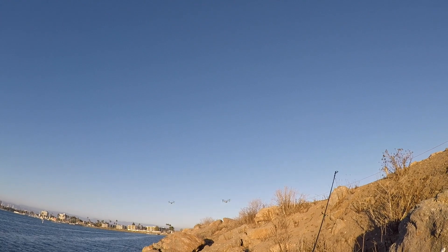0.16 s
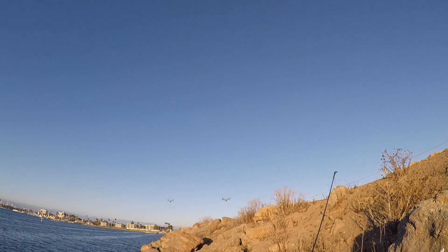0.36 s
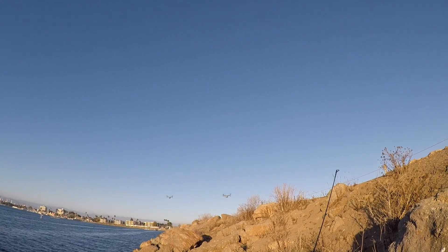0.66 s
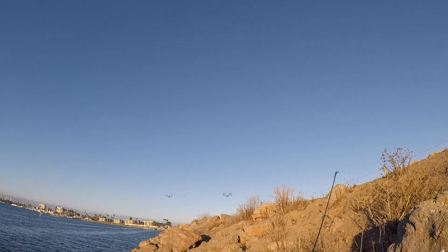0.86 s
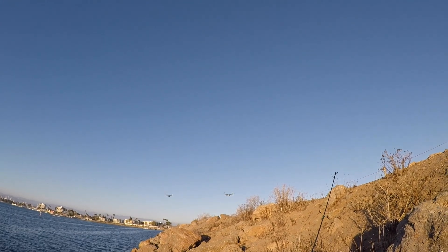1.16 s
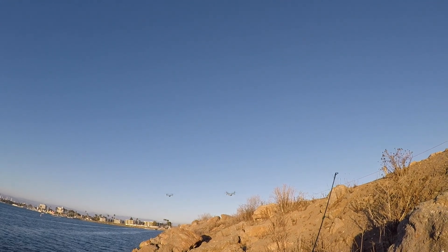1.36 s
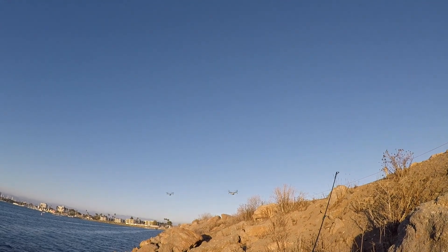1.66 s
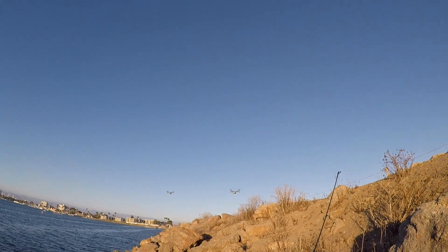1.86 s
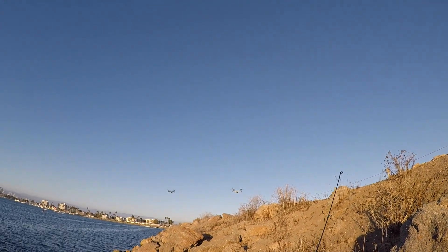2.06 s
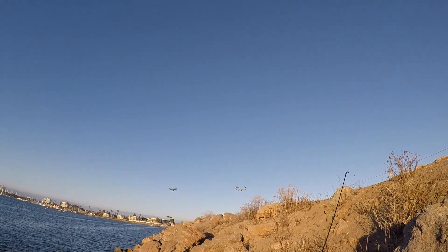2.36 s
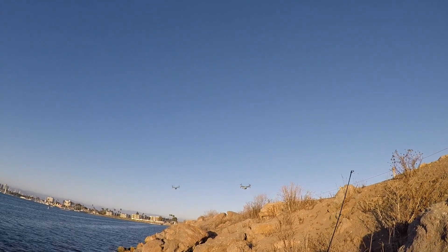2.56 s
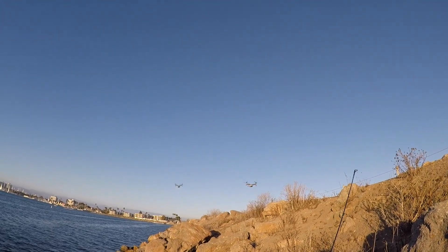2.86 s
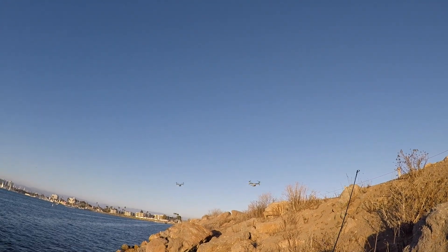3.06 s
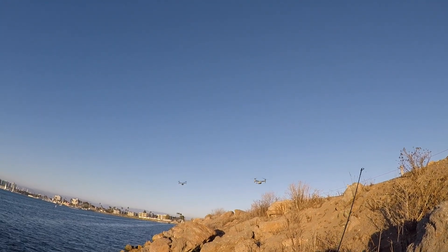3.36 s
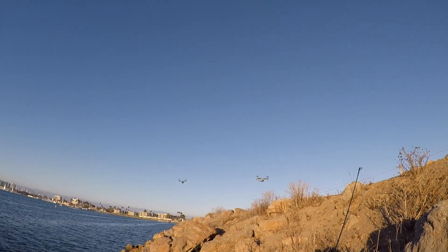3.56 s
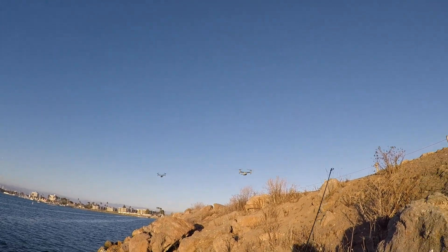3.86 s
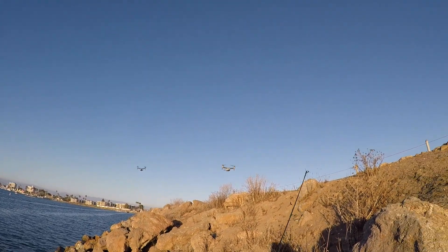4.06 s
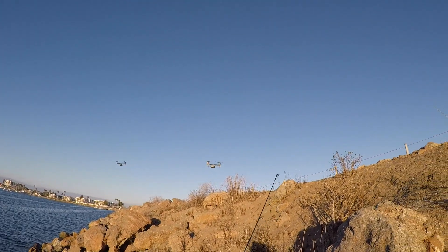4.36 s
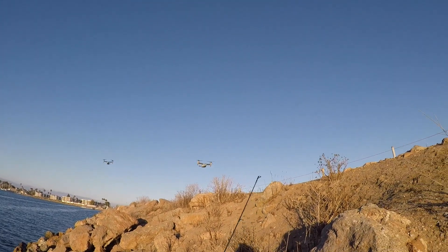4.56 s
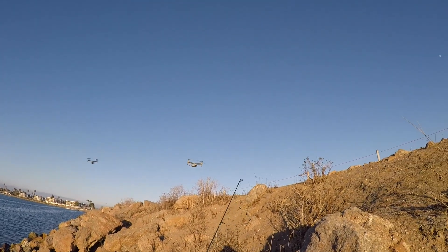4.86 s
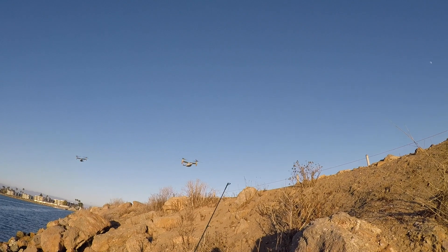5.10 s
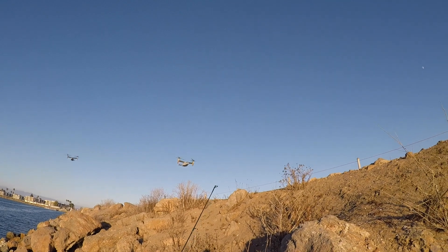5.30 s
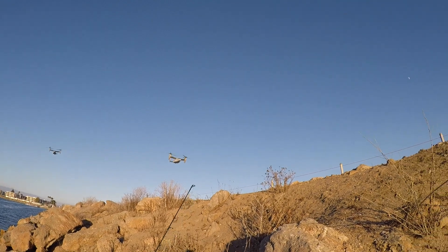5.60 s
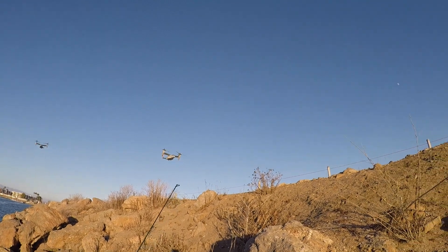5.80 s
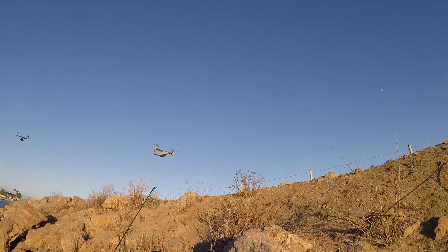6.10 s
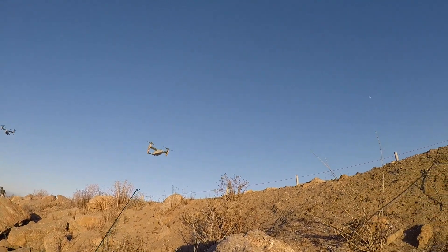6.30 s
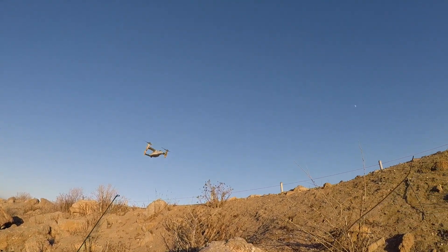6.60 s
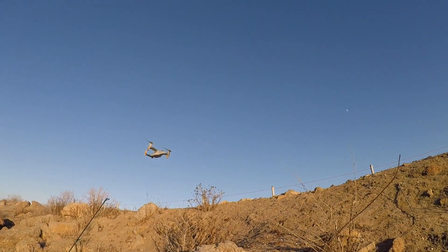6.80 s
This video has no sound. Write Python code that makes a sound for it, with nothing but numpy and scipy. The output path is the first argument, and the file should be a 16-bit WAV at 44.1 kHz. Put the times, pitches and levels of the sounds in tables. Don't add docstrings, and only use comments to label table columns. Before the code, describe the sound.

Two heavy tiltrotor aircraft approach low over water with deep, rapid, overlapping blade thumps under a rushing engine roar, with a few knocks on the microphone.

```python
import sys
import numpy as np
from scipy import signal
from scipy.fft import rfft, irfft, next_fast_len
from scipy.io import wavfile
from scipy.ndimage import uniform_filter1d

SR = 44100
rng = np.random.default_rng(int(sys.argv[2]) if len(sys.argv) > 2 else 0)


def invert_db(level):
    return 10 ** (np.asarray(level, dtype=float) / 20)


def unload_wav(signal):
    wavfile.write(
        sys.argv[1],
        SR,
        np.round(np.clip(np.atleast_2d(signal).T, -1, 1) * 32767).astype(np.int16),
    )


N = 306054
T = np.arange(N) / SR
BLADE_HZ = 23.3

# (time [s], left rotor lag [ms], right rotor lag [ms], left thump [dB], right thump [dB])
FAR_PATH = [(0.0, 23, 24.5, -7.5, -18), (0.5, 18, 22, -7.5, -19), (1.0, 9.5, 13, -9.5, -21),
            (1.5, 2.5, 7.5, -6.5, -19), (2.0, -4.5, -0.5, -11, -16.5), (2.5, -10.5, -7.5, -8.5, -18.0),
            (3.0, -17.5, -12.4, -9, -16), (3.5, -23.5, -21.5, -10.5, -18.5), (4.0, -29, -26.5, -11, -10.5),
            (4.5, -34.5, -30, -13, -13.5), (5.0, -38, -32.9, -11.5, -8), (5.5, -42, -35.5, -9.5, -13.1),
            (6.0, -44.5, -38.0, -10, -12.5), (6.5, -47, -39.0, -11.5, -16),
            (6.75, -48.5, -39.5, -11.5, -11), (6.94, -50, -39.5, -13, -14)]
NEAR_PATH = [(0.0, 44.6, 28.04, -5.5, -12.5), (0.5, 42.88, 26.93, -6.5, -10.7),
             (1.0, 40.26, 24.48, -7, -9.5), (1.5, 39.35, 23.46, -8.5, -7.5), (2.0, 38.34, 22.48, -10, -9),
             (2.5, 37.47, 22.15, -7.5, -7.5), (3.0, 37.65, 20.57, -6.5, -6.5),
             (3.5, 37.67, 20.64, -7.5, -12.5), (4.0, 39, 20.5, -9, -9), (4.5, 41.93, 21.61, -6.5, -4.5),
             (5.0, 44.82, 22.0, -5.0, -6), (5.5, 49.82, 23.98, -9, -6), (6.0, 57.13, 27.6, -6, -4),
             (6.5, 66.3, 32.13, -7, -6.5), (6.75, 74.3, 36.95, -7.3, -4), (6.94, 80.7, 41.5, -7.5, -4)]
# (thump width [ms], ground echo delay [ms], ground share [0-1], bank echo delay [ms], bank share [0-1])
FAR_ROTORS = [
    ((2, 1.22), (1.9, 8.85), (0.42, 0.34), (16.7, 16.9), (0.22, .08)),
    ((1.67, 1.08), (3.1, 5.4), (.48, 0.21), (17.0, 19), (.46, .01)),
]
NEAR_ROTORS = [
    ((1.502, 1.61), (9.65, 11.4), (.24, 0.16), (16.75, 19.4), (.11, .01)),
    ((1.825, 1.246), (7.1, 13.0), (.39, 0.32), (19.1, 19), (.18, 0.078)),
]
# (time [s], level [dB], clearness of the air path [dB])
ROAR_LEVEL = [(0.0, -42.3, -6), (0.4, -38.5, -10), (0.8, -37.5, -15.5), (1.2, -35, -10.5), (1.5, -37, -4.5),
              (1.9, -36.5, -0.5), (2.3, -38, -1), (2.6, -34.5, 4), (3.0, -34, 10.5), (3.25, -35, -1),
              (3.9, -38, 4), (4.3, -34.5, 1), (4.8, -32, 2.5), (5.05, -32.5, 0.5), (5.3, -34, -0.5),
              (5.85, -32, 5), (6.3, -33.5, 5), (6.94, -33.5, 5)]
# (frequency [Hz], density [dB per Hz])
AIR_COLOUR = [(210, -32), (350, -4), (500, -7), (800, -10), (1200, -14), (2000, -18), (2700, -24),
              (4300, -26), (5000, -33), (6700, -41), (7600, -46), (8300, -58), (9500, -72), (12000, -120)]
# (level facing harbour [dB], level facing bank [dB], share of clearness [0-1])
UPPER_RANGES = [
    (-11, -6, 0.058),
    (-13, -10.5, 0.4),
    (-23, -24, 1),
]
# (time [s], time [s])
SWING_S = (2.7, 5.8)
# (time [s], level under widest [dB])
STEREO_OPENING = [(0, -58), (.55, -42), (.65, -14.5), (1.5, -3.5), (2.8, -1.7), (3.9, -1), (4.15, -14.5),
                  (4.33, -23), (4.4, -59)]
# (time [s], length [s], level [dB])
TREBLE_LEAKS = [(.15, 0.051, -12.5), (4.74, 0.016, -24), (5.26, .04, -33), (5.612, 0.069, -14.5),
                (5.957, 0.048, -18.5), (6.02, 0.044, -9.5), (6.257, 0.024, -14), (6.353, 0.042, -18),
                (6.485, .06, -15)]
# (frequency [Hz], width [Hz], facing harbour [dB], facing bank [dB], level in the side [dB])
PORT_CAVITIES = [(1980, 140, -13, -18.5, -14), (3200, 230, -4.5, -5.5, 0.5), (3790, 370, -15, -2, -19),
                 (4600, 68, -4, 0, -15.5), (5280, 370, 0.5, -29, 6.5), (6070, 550, -17.5, 5.5, -7.5),
                 (7150, 170, 8.5, 2.5, 8.5), (8650, 140, -17, 9.5, -16.5)]
# (frequency [Hz], level [dB])
SIDE_RESPONSE = [(20, -10.5), (3000, 7.5), (3500, -15.5), (3900, -4.5), (4300, -10), (4700, -6.5),
                 (20000, 3)]
# (frequency [Hz], width [Hz], share lost [0-1], start [s])
HOUSING_SHADES = [(2880, 180, .5, 4.7), (3380, 250, .75, 5.9)]
# (frequency [Hz], density [dB per Hz])
SELF_NOISE_COLOUR = [(3000, -30), (5000, 2), (8000, 0), (10000, -3), (11500, -9), (13000, -11),
                     (15500, -14), (17000, -60)]
# (time [s], length [s], share let through [0-1])
TREBLE_SPELLS = [(-.1, .92, 0.8), (1.721, .06, 0.9), (2.678, .36, .7), (3.162, 0.91, .99),
                 (4.179, 0.19, 0.5), (5.549, .08, 0.6), (5.933, .21, .9), (6.487, 0.14, 0.4)]
# (frequency [Hz], density [dB per Hz])
RUMBLE_COLOUR = [(15, -20), (30, -10), (60, 0), (120, 0), (200, -3), (320, -7), (430, -20), (700, -40),
                 (2500, -140)]
# (time [s], mid level [dB], side level [dB], ring [Hz], t60 [s])
HOUSING_KNOCKS = [
    (.236, -32.5, -75, 2840, 0.013),
    (.238, -46, -59, 6370, 0.0096),
    (1.058, -45, -49.5, 5570, 0.0099),
    (3.784, -22, -7, 1146, 0.018),
    (3.786, -16, -6, 560, 0.017),
]
# (time [s], level [dB])
BLADE_SLAPS = [(1.583, -18), (1.627, -17), (2.856, -17), (3.151, -16), (3.405, -19), (3.492, -20),
               (3.832, -22), (4.044, -28), (4.939, -16), (5.065, -16), (5.192, -16.5), (5.283, -15),
               (5.321, -14), (5.668, -16.5)]
# (time [s], mid level [dB], side level [dB], ring [Hz], t60 [s])
HOUSING_BUMP = [
    (5.7435, -18, -70, 1200, .012),
    (5.7465, -17, -70, 600, .012),
    (5.7553, -9, -70, 550, .008),
    (5.7556, -15, -70, 1150, .01),
    (5.7558, -15, -70, 1900, .01),
    (5.7582, -7, -70, 280, .03),
    (5.7578, -1, -70, 108, .06),
]


def columns(table, smooth_s=0.):
    s, *cols = np.transpose(table)
    curves = np.array([np.interp(T, s, col) for col in cols])
    return uniform_filter1d(curves, int(smooth_s * SR) + 1, axis=1, mode="nearest")


def shaped(x, points, lo_hz=0., hi_hz=SR, steep=10):
    size = next_fast_len(N)
    hz = np.maximum(np.arange(size // 2 + 1) * SR / size, 1)
    point_hz, point_db = np.transpose(points)
    db = np.interp(np.log(hz), np.log(point_hz), point_db)
    edges = 1 / np.sqrt((1 + (lo_hz / hz) ** steep) * (1 + (hz / hi_hz) ** steep))
    return irfft(rfft(x, size) * invert_db(db) * edges, size)[:N]


def resonance(x, hz, width_hz):
    return signal.lfilter(*signal.iirpeak(hz, hz / width_hz, SR), x)


def unit(x):
    return x / np.sqrt(np.mean(x ** 2))


def walk(rate_hz):
    hold = int(SR / rate_hz)
    steps = np.repeat(rng.standard_normal(N // hold + 1), hold)
    return unit(uniform_filter1d(uniform_filter1d(steps, hold), hold)[:N])


def hump(at_s, width_s):
    return np.exp(-((T - at_s) / width_s) ** 2)


def opening():
    db = columns(STEREO_OPENING)[0]
    hiss = invert_db(-3.5 + 0.36 * db) * (np.arange(N) < 4.75 * SR)
    return 1.3 * invert_db(db), invert_db(-13 + db), invert_db(-9.5 + db), hiss


def treble_leak():
    return sum(invert_db(db) * (abs(T - s) < length / 2) for s, length, db in TREBLE_LEAKS)


def thump(ms, width_ms, dip=1.0, lean=1.524):
    period_ms = 1000 / BLADE_HZ
    u = ((ms + period_ms / 2) % period_ms - period_ms / 2) / width_ms
    return (1 - dip * u ** 2 + lean * u) * np.exp(-u ** 2 / 2)


def rotor(lag_ms, db, spans):
    climb = np.linspace(0, 1, N) ** 2
    curves = (start + (end - start) * climb for start, end in spans)
    width_ms, ground_ms, ground, bank_ms, bank = curves
    ms = T * 1000 - lag_ms + 0.085 * walk(14)
    direct = thump(ms, width_ms)
    ground_echo = ground * thump(ms - ground_ms, 1.76 * width_ms)
    bank_echo = bank * thump(ms - bank_ms, 1.48 * width_ms)
    return invert_db(0.39 + db + 0.58 * walk(8)) * (direct + ground_echo + bank_echo)


def aircraft(path, rotors):
    curves = columns(path, .3)
    return sum(map(rotor, curves[:2], curves[2:], rotors))


def blade_swish():
    far_depth = 0.64 * hump(3.28, 0.93)
    out = 0
    for path, depth, late_ms in ((FAR_PATH, far_depth, -1.6), (NEAR_PATH, .25, -1.5)):
        late_s = (columns(path, .3)[0] + late_ms) / 1000
        out = out + depth * np.exp(3.0 * (np.cos(2 * np.pi * BLADE_HZ * (T - late_s)) - 1))
    return out * invert_db(2.6 * walk(23))


def roar(thumps):
    low_db, clear_db = columns(ROAR_LEVEL, .08)
    _, _, wide, hiss = opening()
    upper_db = [low_db + np.interp(T, SWING_S, (harbour_db, bank_db)) + share * clear_db
                for harbour_db, bank_db, share in UPPER_RANGES]
    gusts_db = 4.5 * hump(1.02, 0.14) + 1 * hump(5.87, 0.14)
    swish = blade_swish()
    puff = uniform_filter1d(np.maximum(thumps, 0) ** 2, 130) * invert_db(1.6 * walk(40))
    # (from [Hz], to [Hz], level [dB], share of swish, share of puff, side over mid)
    ranges = [(373, 1263, low_db, 1.1, 3.6, wide),
              (1290, 2440, upper_db[0], 0.52, 0.64, wide * invert_db(-5)),
              (2420, 4490, upper_db[1] + gusts_db, 1.7, 0.32, wide * invert_db(-6.5)),
              (4620, 16000, upper_db[2], 3.2, .1, hiss + treble_leak())]
    out = 0
    for lo_hz, hi_hz, db, swish_share, puff_share, width in ranges:
        gate = (1 + swish_share * swish + puff_share * puff) * invert_db(0.34 * walk(60))
        gate = gate / np.sqrt(uniform_filter1d(gate ** 2, SR // 5))
        mid, side = (unit(shaped(gate * rng.standard_normal(N), AIR_COLOUR, lo_hz, hi_hz)) for _ in range(2))
        out = out + invert_db(db + .5 * walk(9)) * np.array([mid, width * side])
    return out - 0.54 * hump(6.29, .25) * resonance(out, 550, 670)


def ports(x):
    turn = np.interp(T, SWING_S, (0, 1))
    out = np.array([x[0], shaped(x[1], SIDE_RESPONSE)])
    for hz, width_hz, harbour_db, bank_db, side_db in PORT_CAVITIES:
        mid_gain = invert_db(harbour_db + turn * (bank_db - harbour_db))
        out += resonance(x, hz, width_hz) * np.array([mid_gain, np.full(N, invert_db(side_db))])
    for hz, width_hz, share, s in HOUSING_SHADES:
        shade = np.interp(T, (s, s + .25), (0, share))
        out = out - shade * resonance(out, hz, width_hz)
    return out


def self_noise():
    treble_cut_hz = 11300
    width = invert_db(3.0) * opening()[3] + 2.5 * treble_leak()
    spells = sum(share * (T > s) * (T < s + length) for s, length, share in TREBLE_SPELLS)
    top = np.clip(.03 + spells, 0, 1)
    blink = top * (walk(45) > 1.5 - 4.0 * top)
    out = 0
    for lo_hz, hi_hz, gate in ((0, treble_cut_hz, 1), (treble_cut_hz, SR, blink)):
        mid, side = (shaped(rng.standard_normal(N), SELF_NOISE_COLOUR, lo_hz, hi_hz, steep=40) for _ in range(2))
        out = out + gate * np.array([mid, width * side])
    db = -73.5 - 0.44 * T + 3.2 * top
    return invert_db(db + 7.5 + 1.1 * walk(33)) * out


def rumble():
    mid, side = (unit(shaped(rng.standard_normal(N), RUMBLE_COLOUR)) * invert_db(2.0 * walk(9)) for _ in range(2))
    return invert_db(-26 - 0.09 * T) * np.array([mid, opening()[1] * side])


def damped_rings(strikes):
    out = np.zeros((2, N))
    t = np.arange(SR // 10) / SR
    for s, mid_db, side_db, hz, t60 in strikes:
        decay = np.exp(-np.log(1000) * t / t60)
        onset = 1 - np.exp(-5 * t * hz)
        ring = np.sin(2 * np.pi * hz * t) * decay * onset
        start = int(s * SR)
        out[:, start:start + len(t)] += invert_db(np.array([[mid_db], [side_db]])) * ring
    return out


def housing_knocks():
    return damped_rings(HOUSING_KNOCKS)


def blade_slaps():
    strikes = []
    for s, db in BLADE_SLAPS:
        side_db = db - 9 + np.interp(s, *np.transpose(STEREO_OPENING))
        strikes.append((s, db, side_db, 540 + 46 * s, 0.0094))
    return damped_rings(strikes)


def housing_bump():
    return damped_rings(HOUSING_BUMP)


def scene():
    thumps = aircraft(FAR_PATH, FAR_ROTORS) + aircraft(NEAR_PATH, NEAR_ROTORS)
    pan_db = opening()[0]
    air_and_noise = ports(roar(thumps)) + self_noise() + rumble()
    mid, side = air_and_noise + housing_knocks() + blade_slaps() + housing_bump()
    port_lag = 1.3
    side = side - port_lag * pan_db / 2 * np.gradient(thumps)
    panned = thumps * invert_db(np.array([pan_db, -pan_db]) / 2)
    return panned + np.array([mid + side, mid - side])


def band_limit(x):
    return signal.sosfilt(signal.butter(12, 15800, fs=SR, output="sos"), x)


def record(dry):
    bass_cut = signal.butter(2, 27, "high", fs=SR, output="sos")
    x = signal.sosfilt(bass_cut, dry)
    ceiling = .93
    mix = x / (1 + (abs(x) / ceiling) ** 4) ** .25 - .0017
    return band_limit(mix)


dry = scene()
out = record(dry)
unload_wav(out)
```